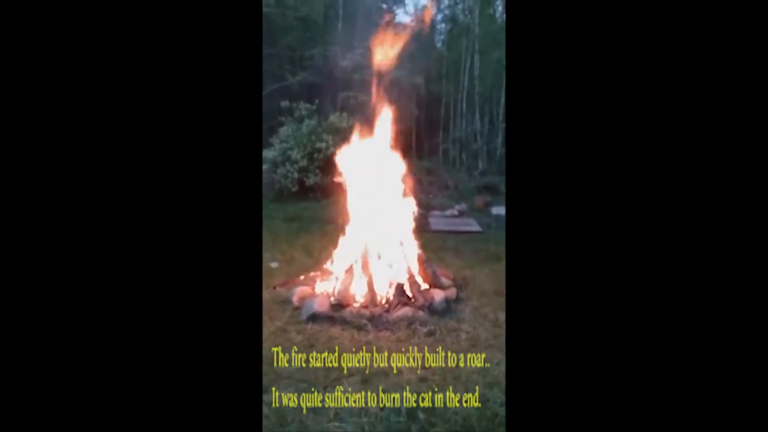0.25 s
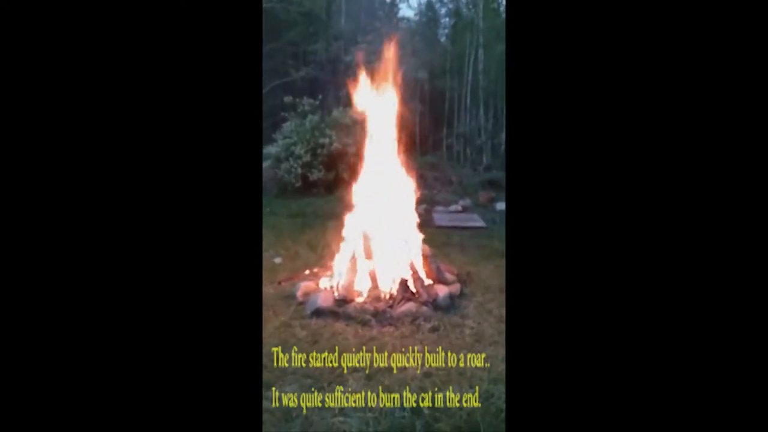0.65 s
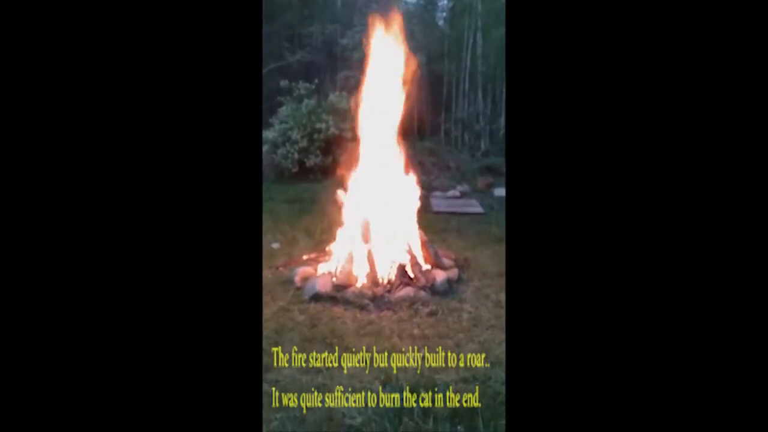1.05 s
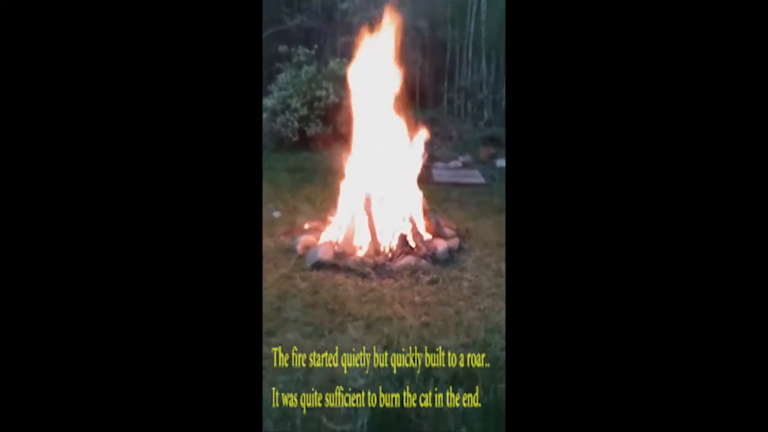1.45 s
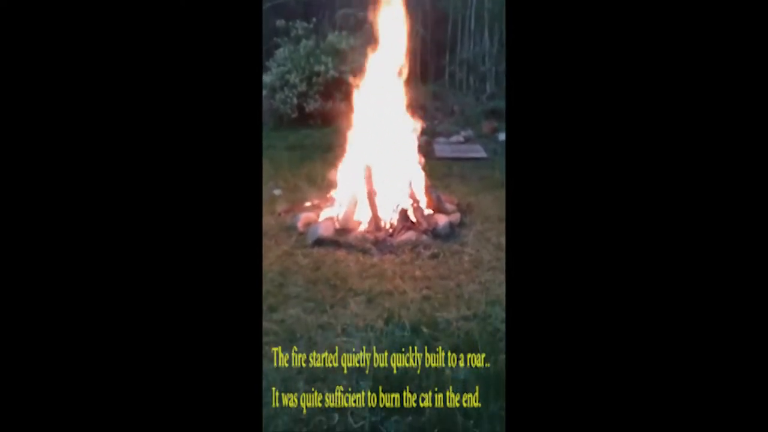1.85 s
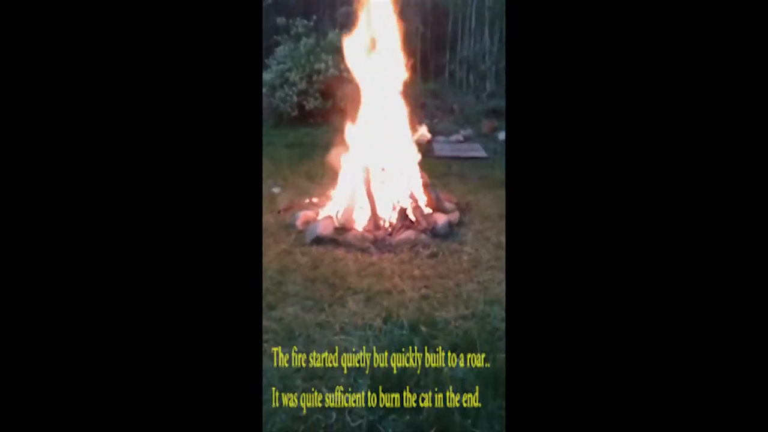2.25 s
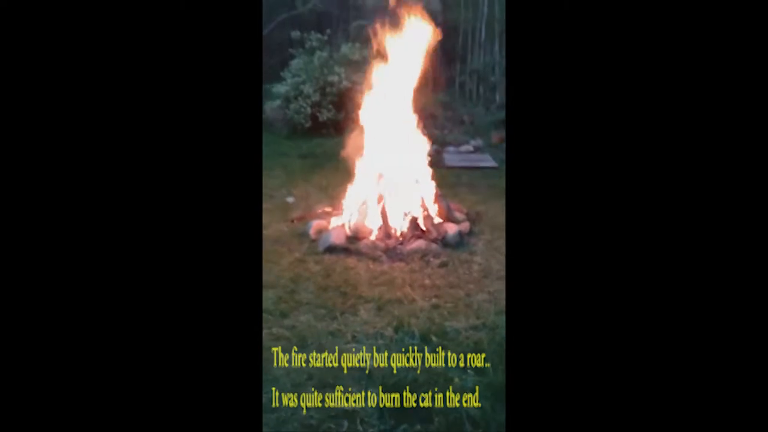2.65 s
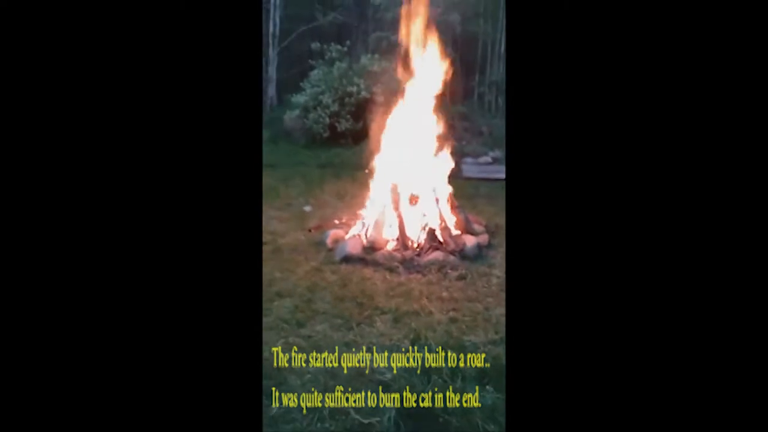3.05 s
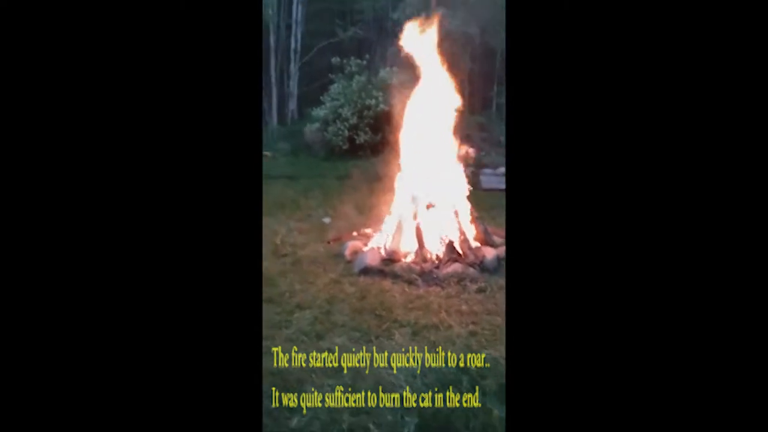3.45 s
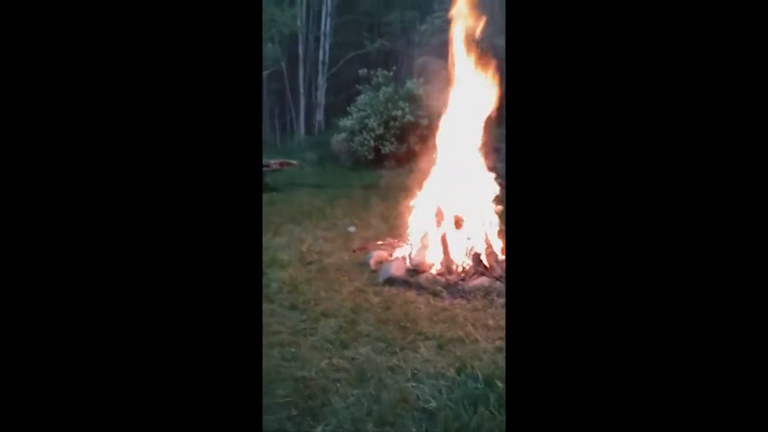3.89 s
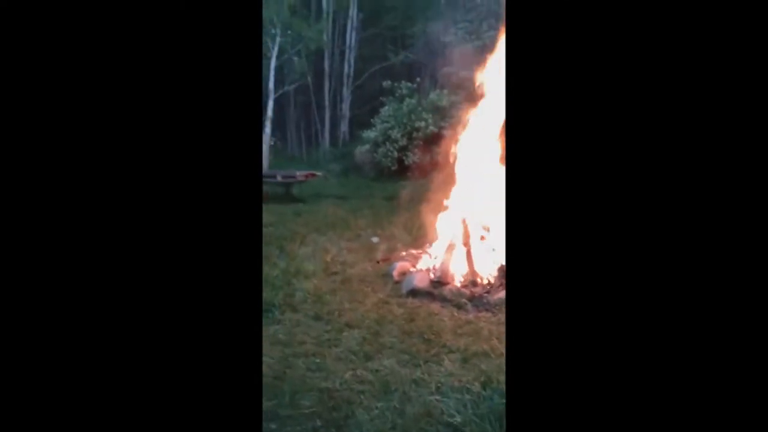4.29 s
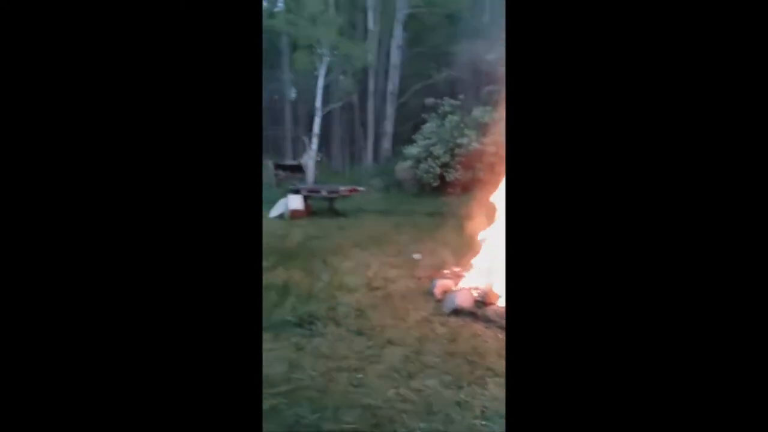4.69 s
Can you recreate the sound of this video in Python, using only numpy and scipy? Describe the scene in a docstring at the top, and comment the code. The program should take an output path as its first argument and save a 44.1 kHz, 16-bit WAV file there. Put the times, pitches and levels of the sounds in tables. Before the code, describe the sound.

A tall wood fire burns in an open grassy yard, a few metres from the microphone. A low fluttering rumble runs throughout beneath thin hiss and resin sizzle. Sharp, glassy pops scatter irregularly, grow denser and louder after the middle, with a brief gassy sputter, then one enormous crack just past four seconds. Smaller snaps follow, with faint echoes from trees.

```python
"""Bonfire in a yard

A tall wood fire burns in a grassy yard, a few metres from the microphone: filtered noise rumbles and roars.
Pockets of steam burst in the wood: sharp noise bursts and log modes, with trails and echoes off logs and trees.
Resin sizzles (random clicks over hiss), steam whistles (narrowing noise bands) and gas spurts (gated grains).
The microphone rings near 11 kHz, drawn into the treble spectra, so snaps sound glassy."""
import sys
import numpy as np
from scipy import signal
from scipy.fft import rfft, irfft, next_fast_len
from scipy.io import wavfile
from scipy.ndimage import uniform_filter1d

SR = 44100
rng = np.random.default_rng(int(sys.argv[2]) if len(sys.argv) > 2 else 0)


def transcribe(u):
    """Save the signal u as a 16-bit wav file named by the first command-line argument.

    u: samples, shape (n,) or (channels, n), limited to [-1, 1]; the rate is SR.
    q: integer samples, one column per channel.
    """
    v = np.clip(np.atleast_2d(u).T, -1, 1)
    q = np.round(v * 32767).astype(np.int16)
    wavfile.write(sys.argv[1], SR, q)


N = 212914
TIME_S = np.arange(N) / SR

# draught of the flame column: (time [s], level [dB re full blaze])
DRAUGHT = [(0, -2), (.12, -2.5), (.3, -7.5), (.47, -5), (.72, -6), (.9, -1.5), (1.15, 1), (1.45, -1.5),
           (1.98, 0.5), (2.3, -1), (2.75, .5), (3.1, -0.5), (3.24, 2), (3.5, -0.5), (4.26, 2.5), (4.4, -3),
           (4.83, -2)]
# loud bursting pockets: (time [s], treble snap [dB], wooden knock [dB],
# knock tilt from 1 to 8 kHz [dB/octave], trailing crackle [dB])
POPS = [(0.151, -34, -51.5, -3, -59), (0.5588, -34, -57.5, 1, -58), (0.8039, -26, -44.5, 4, -46),
        (0.999, -33.5, -59, 11, -50), (1.3495, -29.5, -32.5, -1, -49), (1.398, -38, -62, 12, -49),
        (1.7599, -48, -46.5, 2, -70), (1.8474, -31.5, -38.5, 2.5, -49), (1.9119, -32, -41.5, -3.5, -53),
        (1.9621, -26.5, -43, 3, -38.5), (2.0941, -37.5, -51, 12, -53), (2.3637, -31, -51, 5.5, -49),
        (2.4098, -32, -52, 15, -40), (2.4247, -27, -43, 3, -41), (2.591, -34.5, -62, 6, -48),
        (2.7225, -38, -59, 0, -56), (2.91, -39.5, -52, 5, -50), (3.2885, -23, -39, 7.5, -32.5),
        (3.3779, -39.5, -59, -4, -52), (3.4274, -32, -62, -1, -41), (3.638, -21, -44.5, -4, -35),
        (3.6505, -19, -26.5, 2, -39.5), (3.7551, -45, -35, 16, -62), (3.8453, -31.5, -34, 5.5, -46.5),
        (3.9133, -28, -43, 25, -41), (3.944, -29.5, -47, 16, -48), (3.9496, -34, -47, 19, -56),
        (3.9754, -31, -55, -7, -58), (3.9831, -32, -60, 17, -48), (4.1522, -6.5, -17.5, -2, -20),
        (4.19, -32, -41, 1, -53), (4.2861, -35, -46, 12, -49), (4.3697, -22, -41.5, 18, -38.5),
        (4.516, -43, -54, 2, -53), (4.5744, -34.5, -47, 14, -53), (4.6566, -41.5, -59, 5, -48),
        (4.7224, -30, -48, 15, -44), (4.8116, -27.5, -40, 17, -47), (4.8219, -26, -40.5, -5, -42.5)]
# modes of a struck log: (frequency [Hz], decay [s], relative level [dB])
LOG_MODES = [(1230, 0.0011, -2), (2190, 0.00066, 6.5), (2840, 0.00063, 0)]
# knock echoes off the stone ring and the ground: (nominal delay [s], level [dB])
ECHOES = [(.0075, -27), (0.0223, -18)]
# boiling of the resin: (time [s], sizzle before the DISTANT filter [dB])
RESIN = [(0, -62), (.2, -63), (.44, -68.5), (.62, -62), (1.02, -66.5), (1.2, -57.5), (1.48, -57.5),
         (1.65, -71.5), (1.72, -59.5), (2.15, -63), (2.36, -54), (2.72, -62), (3.2, -62.5), (3.38, -60),
         (3.85, -61), (4.3, -64.5), (4.43, -59.5), (4.83, -69)]
# gas from a freshly split log: (peak time [s], rise [s], level before the DISTANT filter [dB])
SPURTS = [(3.665, 0.025, -42), (3.755, 0.048, -44), (3.94, 0.083, -55.5)]
# steam through a crack: (start [s], length [s], pitch [Hz], start level [dB], end level [dB])
WHISTLES = [(0.89, 0.44, 2316, -73.5, -61), (1.36, 0.4, 2275, -70, -78), (3.25, .015, 2190, -58, -67),
            (3.544, 0.74, 2195, -72, -71)]
# relative spectra of each sound: (frequency [Hz], density [dB/Hz])
RUMBLE_SPECTRUM = [(20, -45), (32, -29), (45, -8), (60, -5.5), (92, 1.5), (135, -1.5), (190, -10),
                   (260, -27), (450, -46), (2000, -83)]
ROAR_SPECTRUM = [(40, -48), (120, -7.5), (280, 6), (400, -3), (580, -2), (800, -15.5), (1300, -17),
                 (2500, -47), (6000, -62), (14000, -83)]
SNAP_SPECTRUM = [(200, -63), (2000, -30), (6000, -29.5), (8600, -17.5), (9500, -6), (10300, 2.5),
                 (11400, 0), (12200, -3.5), (12900, -6), (13600, -49), (16000, -46.5)]
KNOCK_SPECTRUM = [(60, -85), (250, -9.5), (340, -2.5), (470, -3.5), (800, -13.5), (1270, -1), (1650, -5.5),
                  (2050, -5), (2750, 0.5), (3800, -1.5), (5500, 0), (7000, 5), (9000, -6), (13000, -58),
                  (14000, -62)]
SIZZLE_SPECTRUM = [(500, -74), (3000, -55), (7500, -24), (8700, -20), (9400, -3.5), (10200, 5),
                   (11300, 5.5), (12200, -5), (12950, 0), (13400, -28), (14000, -32)]
HISS_SPECTRUM = [(200, -20), (500, 14.5), (900, 6), (1300, 3.5), (2500, 3), (4000, 1.5), (7000, -1.5),
                 (9000, 1.5), (13000, -2), (13800, -44)]
JET_SPECTRUM = [(100, -48), (400, -11), (1500, -18.5), (2400, -12.5), (4500, -12), (7000, -11.5),
                (8700, -5), (9800, 1), (12900, 4.5), (13700, -53)]
# filter that drops the very top and lifts all below: (frequency [Hz], gain [dB])
DISTANT = [(12900, 8), (13500, -16), (14500, -37)]


def undb(db):
    """Decibels to gain."""
    return 10 ** (np.asarray(db) / 20)


def unit(x):
    """Scale to rms 1."""
    return x / np.sqrt(np.mean(x ** 2))


def curves(table):
    """Each column of a table at every sample."""
    s, *columns = np.transpose(table)
    return [np.interp(TIME_S, s, c) for c in columns]


def colour(x, points, tilt_db_per_octave=0):
    """Minimum-phase filter through (Hz, dB) points, tilted from 1 to 8 kHz."""
    size = next_fast_len(len(x) + 2048) // 2 * 2
    octave = np.log2(np.maximum(np.fft.rfftfreq(size, 1 / SR), 1))
    hz, db = np.transpose(points)
    gain_db = np.interp(octave, np.log2(hz), db)
    gain_db = gain_db + tilt_db_per_octave * np.clip(octave - np.log2(1000), 0, 3)
    # fold the cepstrum to make the filter causal
    cepstrum = irfft(np.log(undb(gain_db)))
    cepstrum[1:size // 2] *= 2
    cepstrum[size // 2 + 1:] = 0
    return irfft(rfft(x, size) * np.exp(rfft(cepstrum)))[:len(x)]


def walk(rate_hz):
    """Slow random wander of rms 1."""
    hold = max(int(SR / rate_hz), 2)
    steps = np.repeat(rng.standard_normal(N // hold + 2), hold)
    return unit(uniform_filter1d(steps, hold)[:N])


def grains(size, rate_hz, spread_db):
    """Random clicks, most of them small and a few large."""
    chance = rng.random(size)
    strength = rng.exponential(size=size)
    sign = rng.choice([-1, 1], size)
    return (chance < rate_hz / SR) * sign * undb(spread_db * np.minimum(strength, 5))


def dose(x, db, length_s):
    """Give a burst the energy of a level held for so many seconds."""
    return x * undb(db) * np.sqrt(length_s * SR / np.sum(x ** 2))


def add(out, x, s):
    """Mix a burst in at a time."""
    i = max(int(s * SR), 0)
    out[i:i + len(x)] += x[:max(N - i, 0)]


def flames(rumble_db=-43.5, roar_db=-59.5, roar_db_per_db=0.95, rumble_flutter_db=1.0, roar_flutter_db=1.7):
    """Turbulent gas: a fluttering low rumble under a softer roar, both growing with the draught."""
    draught_db, = curves(DRAUGHT)
    rumble = unit(colour(rng.standard_normal(N), RUMBLE_SPECTRUM))
    rumble *= undb(rumble_db + draught_db + rumble_flutter_db * walk(14))
    roar = unit(colour(rng.standard_normal(N), ROAR_SPECTRUM))
    roar *= undb(roar_db + roar_db_per_db * draught_db + roar_flutter_db * walk(18))
    return rumble + roar


def pops(rows, snap_s=0.00072, knock_s=0.00087, rise_s=0.00029, trail_s=0.022, linger_s=0.047, linger_db=-19):
    """Each pocket tears open in about a millisecond; splinters and log echoes trail it in like colour."""
    out = np.zeros(N)
    t = np.arange(SR // 3) / SR
    # the trail builds as the first echoes arrive, then dies fast and slow
    build = 1 - np.exp(-(t / 0.0015) ** 2)
    trail_shape = build * (np.exp(-t / trail_s) + undb(linger_db) * np.exp(-t / linger_s))
    tear_shape = np.exp(-t / np.array([[snap_s], [knock_s]])) * (1 - np.exp(-t / rise_s))
    for s, snap_db, knock_db, tilt_db_per_octave, trail_db in rows:
        tear = rng.standard_normal((2, len(t))) * tear_shape
        tear[:, int(rise_s * SR)] += 1.6  # the first break is the hardest
        splinters = unit(grains(len(t), rate_hz=670, spread_db=2.0)) + 0.5 * rng.standard_normal(len(t))
        trail = colour(trail_shape * splinters, DISTANT)
        snap = dose(colour(tear[0], SNAP_SPECTRUM), snap_db, 0.003)
        knock = dose(wood(tear[1], tilt_db_per_octave), knock_db, 0.0013)
        snap_trail = dose(colour(trail, SNAP_SPECTRUM, 4.1), trail_db, 0.021)
        knock_trail = dose(wood(trail, tilt_db_per_octave), trail_db + knock_db - snap_db, 0.022)
        add(out, snap + knock + snap_trail + knock_trail, s)
        # a pop that faces away has more trail for its snap, and more echo up to a cap
        facing_db = min(trail_db - snap_db + 21, 0)
        for delay_s, echo_db in ECHOES:
            add(out, knock * undb(echo_db + facing_db), s + delay_s * rng.uniform(0.98, 0.99))
    return out


def wood(x, tilt_db_per_octave, ring_db=-4):
    """A crack as the log passes it on: broadband, with a few quickly damped modes."""
    t = np.arange(SR // 50) / SR
    modes = sum(undb(db) * np.exp(-t / decay_s) * np.cos(2 * np.pi * hz * t) for hz, decay_s, db in LOG_MODES)
    crack = unit(colour(x, KNOCK_SPECTRUM, tilt_db_per_octave))
    ring = unit(signal.fftconvolve(x, modes)[:len(x)])
    # bright cracks are small splinters, which hardly move the log
    return crack + undb(ring_db - 0.6 * tilt_db_per_octave) * ring


def ticks(rate_hz=4.4, snap_mid_db=-45, snap_spread_db=5, knock_re_snap_db=-14, trail_re_snap_db=-15):
    """Small pockets bursting at random, as rows like those of the loud pops."""
    rows = []
    for when, strength, knock, tilt in rng.random((int(rate_hz * N / SR), 4)):
        snap_db = snap_mid_db + snap_spread_db * (2 * strength - 1)
        knock_db = snap_db + knock_re_snap_db + 6 * (2 * knock - 1)
        rows.append((when * N / SR, snap_db, knock_db, 9 * tilt, snap_db + trail_re_snap_db))
    return rows


def embers(base_hiss_db=-70.5, hiss_db_per_draught_db=0.5, hiss_db_per_resin_db=0.32, surge_db=1.2):
    """Tiny bursts of resin in flurries over a soft hiss that follows the heat; levels before DISTANT."""
    (draught_db,), (sizzle_db,) = curves(DRAUGHT), curves(RESIN)
    resin_db = sizzle_db - sizzle_db.mean()
    hiss_db = base_hiss_db + hiss_db_per_draught_db * draught_db + hiss_db_per_resin_db * resin_db
    clicks = unit(grains(N, rate_hz=1500, spread_db=4.5))
    flurry = undb(2.0 * walk(55) + 1.15 * walk(200))
    boiling = flurry * (clicks + 0.84 * rng.standard_normal(N))
    sizzle = unit(colour(boiling, SIZZLE_SPECTRUM)) * undb(sizzle_db + surge_db * walk(12))
    hiss = unit(colour(0.65 * clicks * flurry + rng.standard_normal(N), HISS_SPECTRUM)) * undb(hiss_db)
    return sizzle + hiss


def spurt(fall_db_per_s=240):
    """Wet gas sputters out of the split; each gush builds, then dies as its pressure is spent."""
    flow = np.zeros(N)
    for peak_s, rise_s, db in SPURTS:
        build = np.clip(1 + (TIME_S - peak_s) / rise_s, 0, 1)
        flow += build * undb(db - fall_db_per_s * np.maximum(TIME_S - peak_s, 0))
    drops = unit(grains(N, rate_hz=830, spread_db=2.8))
    sputter = (drops + 0.85 * rng.standard_normal(N)) * undb(3.0 * walk(150))
    return unit(colour(sputter, JET_SPECTRUM)) * flow


def whistle(breathy_hz=290, waver_hz=22, lock_db=-63, attack_s=0.01, release_s=0.028):
    """A steam jet rings a crack: a broad band gives way to a wavering tone as its level rises."""
    out = np.zeros(N)
    for start_s, length_s, hz, start_db, end_db in WHISTLES:
        end_s = start_s + length_s
        attack = np.clip((TIME_S - start_s) / attack_s, 0, 1)
        gate = attack * np.exp(-np.maximum(TIME_S - end_s, 0) / release_s)
        db = np.interp(TIME_S, [start_s, end_s], [start_db, end_db])
        carrier = np.exp(2j * np.pi * np.cumsum(hz + waver_hz * walk(70)) / SR)
        jet = rng.standard_normal(N) + 1j * rng.standard_normal(N)
        band = signal.lfilter(*signal.butter(2, breathy_hz / 2, fs=SR), jet)
        broad = unit(np.real(carrier * band))
        tone = unit(carrier.real)
        tone_share = 1 / (1 + np.exp((lock_db - db) / 2))  # of the power
        out += (np.sqrt(1 - tone_share) * broad + np.sqrt(tone_share) * tone) * undb(db) * gate
    return out


def trees(x, t60_s=0.9, wet_db=-21):
    """The trunks round the yard scatter a faint, late echo, mostly treble; wet_db precedes both filters."""
    t = np.arange(SR) / SR
    echo = rng.standard_normal(SR) * (1 - np.exp(-(t / 0.01) ** 2)) * np.exp(-np.log(1000) * t / t60_s)
    filter_points = [(1000, -8.0), (3000, -16.5), (9000, -2), (13000, -21.0), (14000, 8)]  # (Hz, dB)
    echo = colour(echo / np.linalg.norm(echo), filter_points)
    return signal.fftconvolve(x, echo)[:N] * undb(wet_db)


def scene():
    """The fire and its yard; embers, spurts and tree echoes pass through DISTANT."""
    burning = flames() + whistle()
    sizzling = embers() + spurt()
    cracks = pops(POPS + ticks())
    return (burning + cracks + colour(sizzling + trees(cracks), DISTANT))[None]


def record(dry):
    """Clip at full scale, then low-pass at 16 kHz."""
    low_pass = signal.ellip(8, 0.2, 70, 16000, fs=SR, output="sos")
    return signal.sosfilt(low_pass, np.clip(dry, -1, 1))


dry = scene()
out = record(dry)
transcribe(out)
```